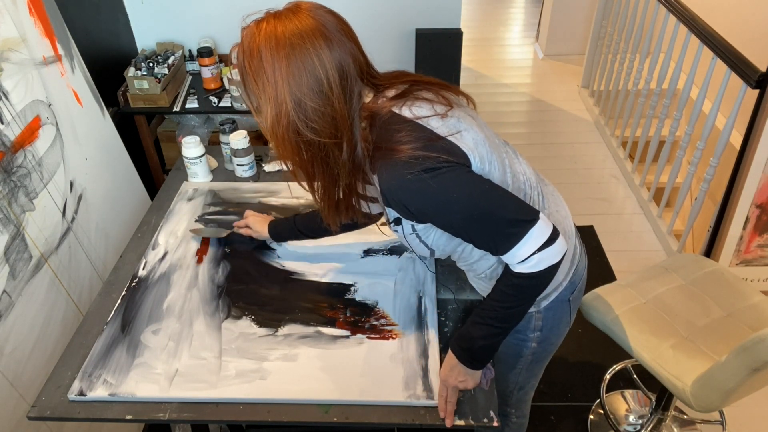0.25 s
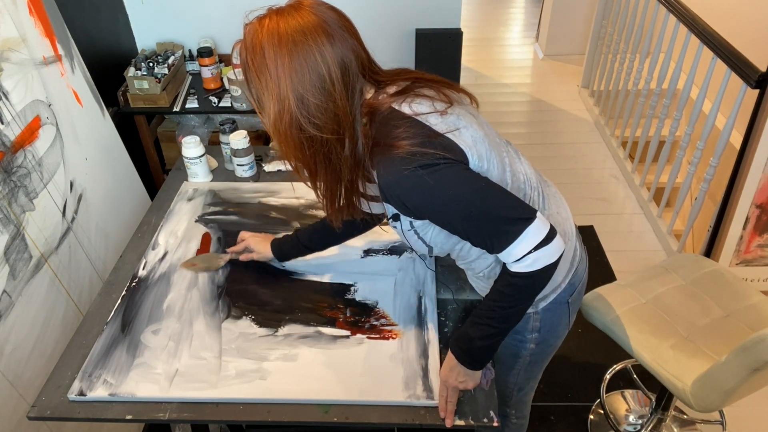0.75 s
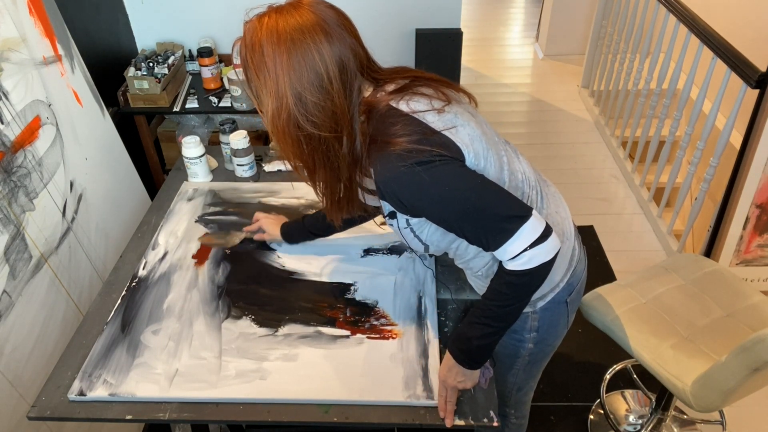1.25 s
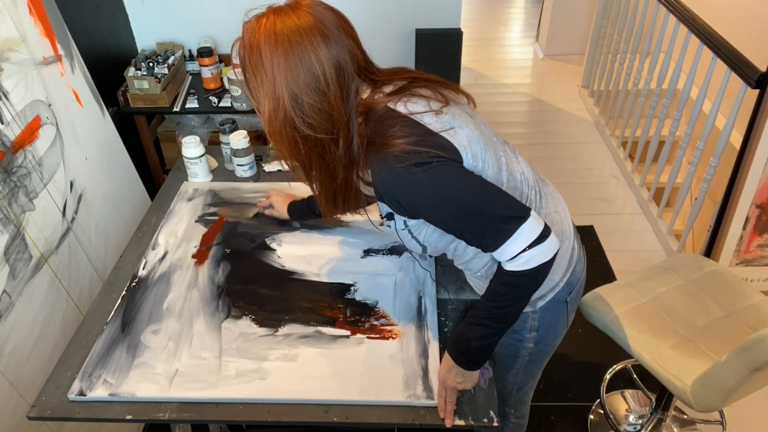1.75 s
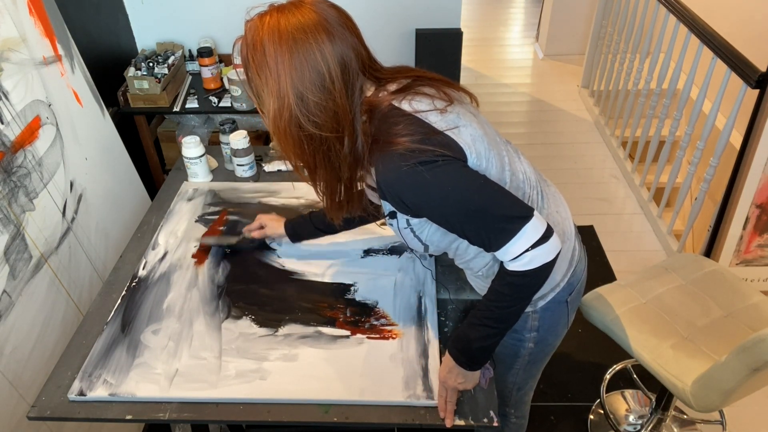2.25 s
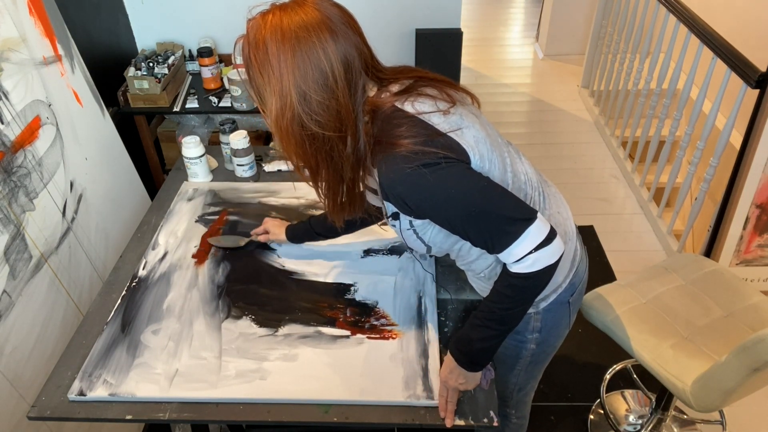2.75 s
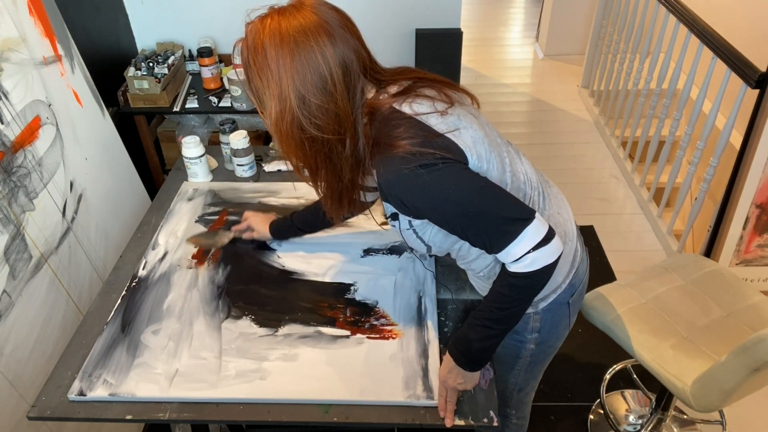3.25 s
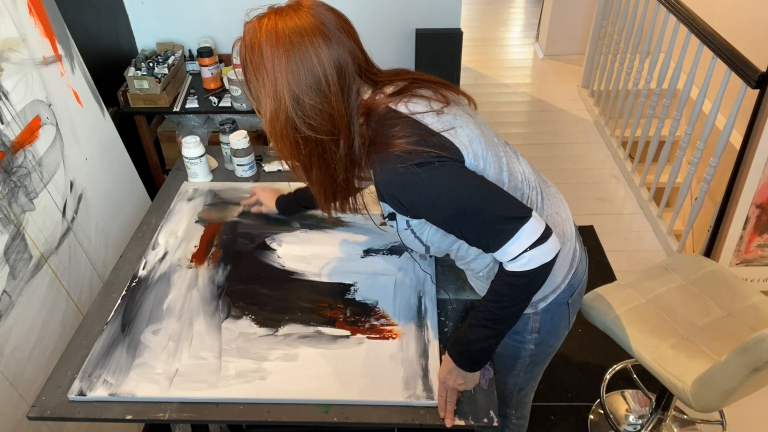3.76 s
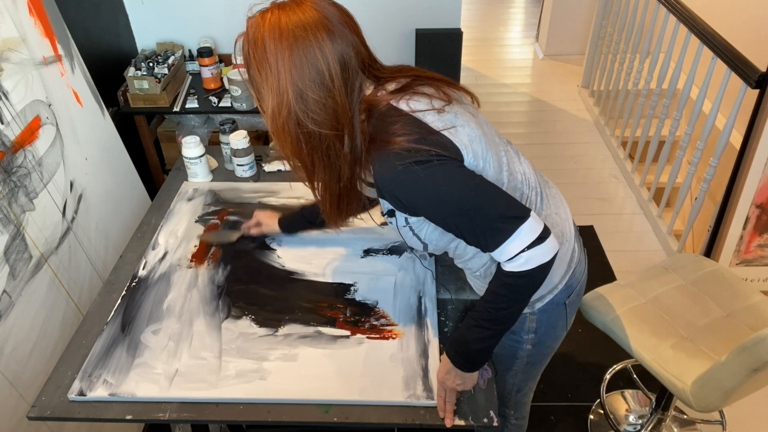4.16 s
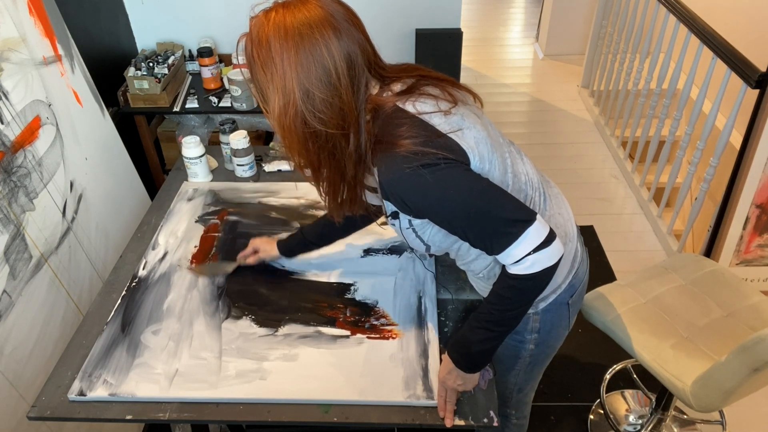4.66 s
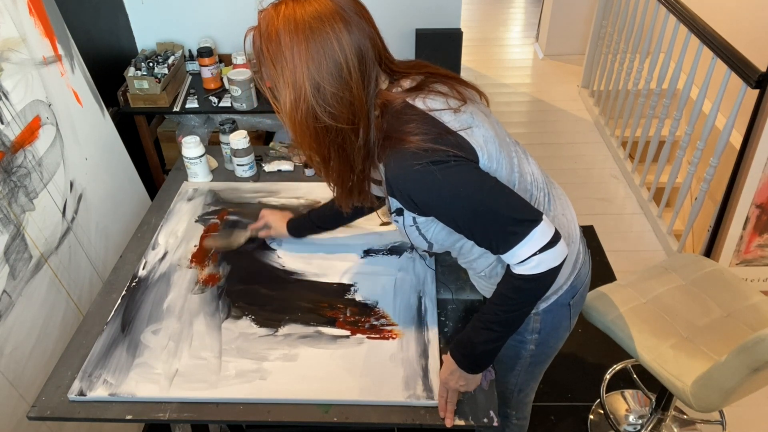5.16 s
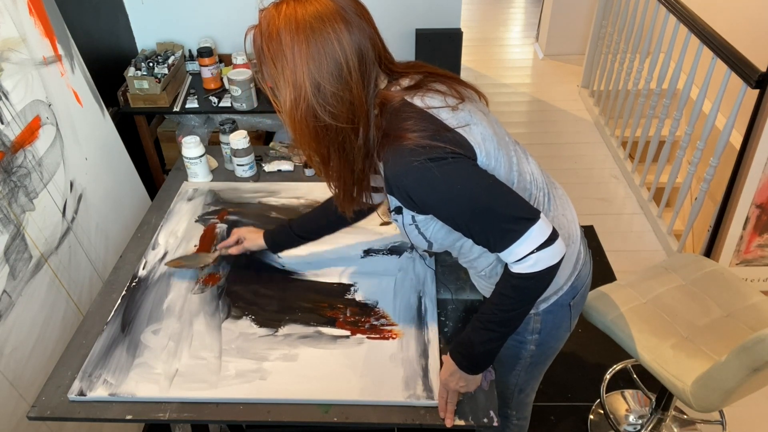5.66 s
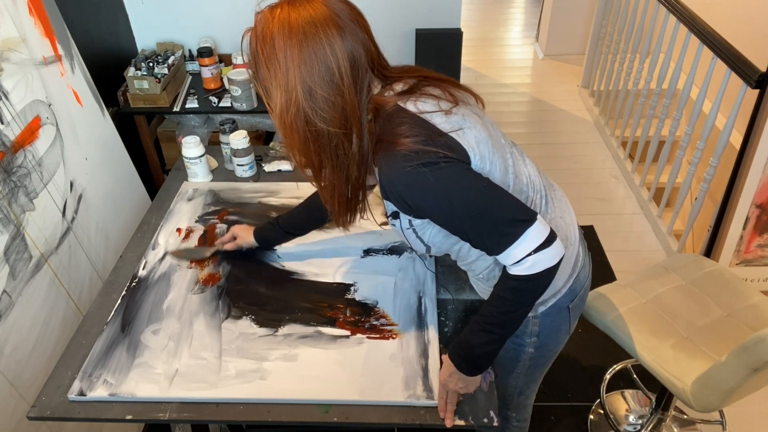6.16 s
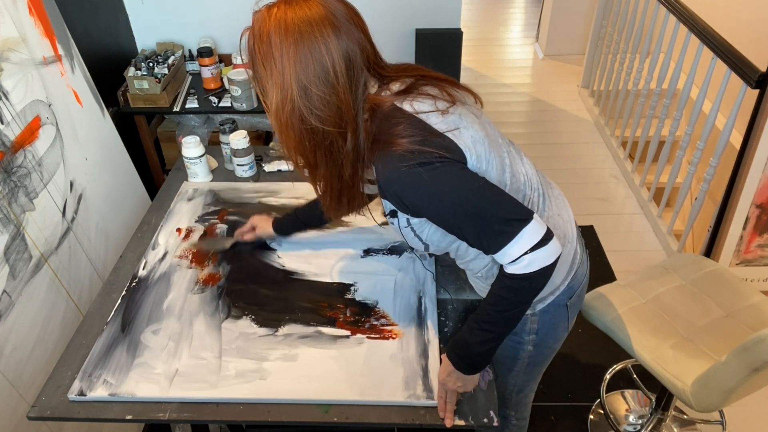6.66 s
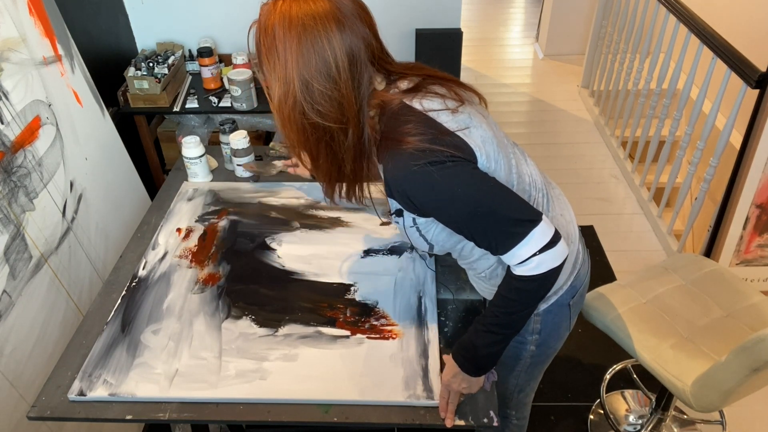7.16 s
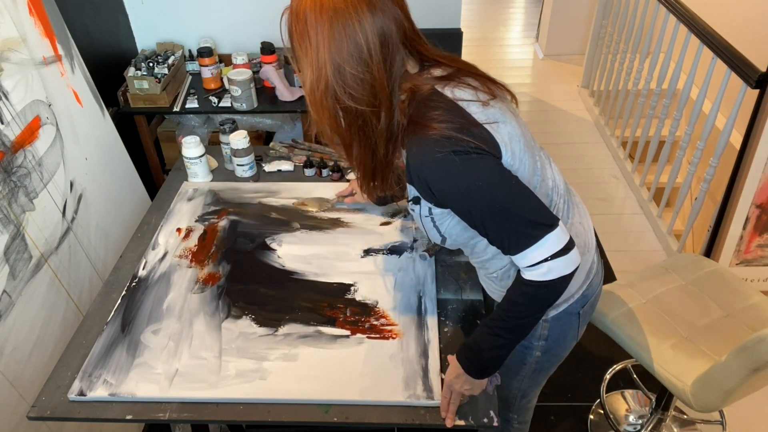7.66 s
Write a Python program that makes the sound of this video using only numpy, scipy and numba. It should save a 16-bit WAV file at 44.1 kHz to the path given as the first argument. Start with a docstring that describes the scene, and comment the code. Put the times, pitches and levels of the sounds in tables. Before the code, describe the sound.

Repeated knocks and gritty scrapes of a flexible blade on stretched canvas, with small squeaks and flicks, ringing briefly in a bare indoor studio.

```python
"""A short, gritty scrape over a deep rumble comes first: a steel palette knife on a stretched canvas.
Then the blade lands again and again on the canvas, which lies on a table, and scrapes paint in short strokes.
Landings ring damped canvas modes with a click and a thud; strokes are noise slips that ring blade and canvas.
Squeaks, bright flicks, soft bumps and one creak fall among them. A bare room rings after each stroke,
over swelling rumble, a low murmur and faint air, all shaped from noise."""
import sys
import numpy as np
from scipy import signal
from scipy.fft import rfft, irfft
from scipy.io import wavfile
from scipy.ndimage import uniform_filter1d
from numba import njit

SR = 44100
rng = np.random.default_rng(int(sys.argv[2]) if len(sys.argv) > 2 else 0)


def natural_amplitude(level_db):
    """Convert a level in decibels to a linear amplitude factor, elementwise."""
    exponent = np.asarray(level_db, float) / 20
    return 10 ** exponent


def unload_wav(signal):
    """Save mono or channel-first audio to the path in sys.argv[1] as 16-bit WAV at rate SR, clipped to [-1, 1]."""
    wavfile.write(
        sys.argv[1],
        SR,
        np.round(np.clip(np.atleast_2d(signal).T, -1, 1) * 32767).astype(np.int16),
    )


N = 348588
T = np.arange(N) / SR

# colour of the deep rumble: pitch_hz, level_db
RUMBLE_COLOUR = [(1.5, -1), (4, 11), (9, 7.5), (17, -4.5), (27, -12), (45, -16), (91, -36.5), (184, -52),
                 (300, -50.5), (600, -100)]
# colour of the faint air: pitch_hz, level_db
AIR_COLOUR = [(210, -43), (350, -2), (733, -8), (1020, -2), (5930, -15.5), (9070, -15.5), (15000, -19)]
# bands of the room tail: pitch_hz, t60_s, level_db
ROOM_BANDS = [(390, 0.36, -3.5), (740, 0.67, -4.5), (1600, 0.65, -4.5), (2800, 0.61, -7.5),
              (5370, 0.6, -11), (8800, 0.35, -10), (14700, 0.21, -28)]
# dull bumps between landings: start_s, level_db (before the swell)
SOFT_BUMPS = [(0.599, -62.5), (1.16, -57), (1.849, -63), (2.602, -60.5), (4.74, -59.5), (7.32, -63)]
# the table groans once: pitch_hz (lower partial), level_db, t60_s
TABLE_CREAK = (280, -40, 0.19)
# the blade sings briefly while pressed: start_s, level_db, length_s, pitch_hz
BLADE_SQUEAKS = [(0.456, -49, .025, 1590), (0.524, -59, .05, 2830), (1.256, -58, .05, 2930),
                 (1.712, -49.5, .03, 1280), (2.528, -54, .03, 1600), (2.538, -50.5, .03, 4110),
                 (2.55, -53, .04, 3200), (2.891, -50, .06, 2020), (2.923, -54, .05, 1720),
                 (3.815, -53, .03, 2750), (4.16, -46, .04, 1670), (4.626, -52.5, .06, 1850),
                 (4.698, -46, .06, 1670), (4.767, -47.5, .05, 2900), (4.81, -45, .04, 3376),
                 (5.139, -52.5, .05, 1850), (5.45, -47.5, .025, 2350), (5.796, -39, .03, 1280),
                 (5.872, -43.5, .04, 1380), (6.168, -48.5, .05, 1660), (6.412, -45, .08, 1840),
                 (6.695, -49, .04, 2370), (7.024, -53.5, .11, 2386), (7.029, -61, .07, 2800),
                 (7.862, -53, .04, 2570)]
# the tip flicks over a ridge of paint: start_s, level_db (at the onset)
TIP_FLICKS = [(0.549, -32.5), (2.9192, -35.5), (3.821, -42), (4.2902, -28), (4.6914, -35), (5.5003, -29),
              (7.0207, -40)]
# blade landings: start_s, knock_peak_db, click_db (over the knock, before CLICK_LIFT_DB)
LANDINGS = [(0.331, -52, -37), (0.46, -56, -1), (0.776, -34.5, -10.5), (1.19, -39.5, -40),
            (1.585, -34, -26), (2.048, -27.5, -16), (2.391, -33, -15), (2.767, -34, -18),
            (3.183, -34, -15.5), (3.576, -30, -15.5), (3.812, -40, -10), (4.14, -32, -9),
            (4.29, -37.5, -0.5), (4.539, -31, -20.5), (4.691, -40, -7), (5.039, -28, -7),
            (5.358, -27.5, -12.5), (5.499, -47, 3), (5.751, -29.5, -12), (6.073, -38.5, -4.5),
            (6.371, -29.5, -14.5), (6.632, -30, -15), (6.908, -28, -17), (7.622, -31, -15.5)]
# colour of the steel click: pitch_hz, level_db
CLICK_COLOUR = [(1200, -1), (2500, 6), (5000, -3), (8000, -12), (12000, -10), (16000, -14)]
# free modes of the stretched canvas: pitch_hz, level_db, t60_s
CANVAS_MODES = [(402, -50, 0.03), (531, -8.5, 0.26), (580, -22, 0.074), (780, -39, 0.042),
                (761.7, 7.5, 0.19), (807, 3.5, 0.077), (844, 6.5, 0.16), (1004, -18.5, 0.17),
                (1079, 2.5, 0.12), (1240, 5, 0.049), (1500, -30, 0.018), (1720, 3, 0.023)]
# colour of the coarse scrape: pitch_hz, level_db
SCRAPE_COLOUR = [(500, -10), (1200, -4.5), (2000, -3.5), (2900, 0), (4200, -7), (6000, -10.5),
                 (8000, -21.5), (12000, -56)]
# colour of the fine hiss and of the flicks: pitch_hz, level_db
HISS_COLOUR = [(4000, -3.5), (6500, -8.5), (8500, -4.5), (11000, -1.5), (13500, -2), (15500, -2)]
# edge dragged through paint: start_s, length_s, start_level_db, lift_level_db, hiss_db (over the scrape)
EDGE_DRAGS = [(.01, 0.051, -43.5, -47.5, -2), (0.459, 0.093, -46, -44, -1), (0.772, 0.074, -50.5, -53, -4),
              (0.852, 0.076, -60, -51, -15.5), (1.208, 0.062, -59, -51.5, -14),
              (1.283, 0.079, -63, -63, -13), (1.704, 0.11, -61.5, -56, -5),
              (2.144, 0.035, -51, -50.5, -8.5), (2.403, .09, -70, -73, -7.5),
              (2.506, 0.052, -60, -45.5, -2), (2.78, 0.084, -71, -77, -7), (2.869, 0.075, -55.5, -43.5, -4),
              (3.181, 0.075, -50, -50, -5.5), (3.275, 0.063, -61, -44.5, -6), (3.575, 0.11, -48, -58.5, -6),
              (3.722, 0.077, -47, -55, -5.5), (3.814, 0.018, -52, -42.5, -9.5),
              (4.137, 0.067, -49.5, -59.5, -7), (4.201, 0.1, -62, -44, -5.5),
              (4.626, 0.055, -63.5, -56, -7), (4.688, 0.07, -53.5, -41.5, -1.5),
              (4.761, 0.072, -45.5, -43.5, -4), (5.035, 0.11, -50, -50, -6),
              (5.375, 0.066, -63, -68.5, -11), (5.445, 0.047, -52, -47, -9),
              (5.493, 0.0074, -35, -39, -1.5), (5.744, 0.077, -46, -55.5, -5),
              (5.826, 0.08, -53.5, -43.5, -4), (6.076, 0.13, -63.5, -44.5, -5),
              (6.402, .065, -66, -45.5, -4), (6.63, 0.084, -48, -52, -4.5), (6.927, 0.06, -65, -61, -17),
              (7.012, 0.033, -44.5, -43.5, -2), (7.696, 0.14, -73, -59.5, -4),
              (7.85, 0.027, -47.5, -51, -16)]
# blade pressed so that it chatters, pitch gliding with the grip:
# start_s, length_s, start_level_db, start_pitch_hz, end_pitch_hz
BLADE_PRESSES = [(.01, 0.059, -48.5, 1190, 1020), (.457, 0.038, -49, 1580, 1240),
                 (0.509, 0.055, -48, 930, 970), (0.775, 0.082, -45.5, 1020, 1280),
                 (.87, 0.059, -58, 1170, 1110), (1.211, 0.12, -53.5, 760, 1110),
                 (1.706, 0.052, -49.5, 1360, 1150), (1.763, 0.048, -47, 880, 835),
                 (2.146, 0.056, -56, 1150, 1030), (2.52, 0.065, -49, 1240, 1080),
                 (2.875, 0.074, -43.5, 1150, 1210), (3.181, 0.079, -42.5, 970, 1110),
                 (3.281, 0.059, -45.5, 1150, 1140), (3.57, 0.12, -47, 990, 1230),
                 (3.72, 0.052, -48, 1030, 960), (3.796, 0.067, -47.5, 830, 860),
                 (4.147, 0.066, -45, 740, 980), (4.213, 0.1, -48.5, 985, 1210),
                 (4.638, 0.071, -45.5, 1230, 1090), (4.69, 0.13, -47, 1190, 1260),
                 (5.037, 0.094, -48.5, 900, 1470), (5.442, 0.072, -46.5, 1190, 1100),
                 (5.75, 0.084, -40, 1050, 1120), (5.835, 0.067, -48, 1290, 1250),
                 (6.077, 0.047, -52, 845, 790), (6.135, .11, -45.5, 1160, 1160),
                 (6.40, 0.096, -45, 1120, 1260), (6.635, 0.079, -43, 870, 1170),
                 (7.007, 0.033, -48.5, 844, 860), (7.665, 0.086, -60, 1060, 870),
                 (7.775, .07, -52.5, 840, 880), (7.853, 0.032, -70, 970, 1150)]

RUMBLE_START_DB, RUMBLE_SAG_DB_PER_S, RUMBLE_SWELL_DB = -33.5, .6, 3
AIR_DB = -77
THUD_DB, THUD_HZ, THUD_SCATTER = -27.5, 115.6, 0.21  # level relative to the knock; scatter in log pitch
BUMP_HZ = 148.6
CREAK_START_S = 6.073
FLICK_T60_S = 0.023
KNOCK_DAMPING = .2  # the blade stays on the cloth, so a knock rings for this share of the free decay
CLICK_LIFT_DB = 3.0
BITE_S = 0.011
DRAG_LIFT_DB_PER_S, PRESS_LIFT_DB_PER_S = 356, 506  # fade once the edge is lifted
PRESS_SAG_DB_PER_S = 36
TOP_HZ = 15900


def unit(x):
    """Scale to rms 1."""
    return x / np.sqrt(np.mean(x ** 2))


def colour(x, points):
    """Shape a noise by (Hz, dB) points on a log axis."""
    hz, db = np.transpose(points)
    f = np.fft.rfftfreq(len(x), 1 / SR)
    gain_db = np.interp(np.log(f + 1), np.log(hz), db, left=-90)
    return irfft(rfft(x) * natural_amplitude(gain_db), len(x))


@njit
def svf(x, hz, width):
    """Band-pass with a moving centre, gain 1 there; width in Hz."""
    y, band, low = np.empty(len(x)), 0., 0.
    for i in range(len(x)):
        g, k = np.tan(np.pi * hz[i] / SR), width / hz[i]
        v = (band + g * (x[i] - low)) / (1 + g * (g + k))
        band, low, y[i] = 2 * v - band, low + 2 * g * v, k * v
    return y


def walk(rate):
    """Random levels of rms 1, held 1 / rate s and slewed twice."""
    k = int(SR / rate)
    held = np.repeat(rng.standard_normal(N // k + 1), k)
    slewed = uniform_filter1d(uniform_filter1d(held, k), k)
    return unit(slewed[:N])


def background():
    """Deep rumble that swells and slowly ebbs, low murmur of the building that flickers, and faint air."""
    deep_db = RUMBLE_START_DB - RUMBLE_SAG_DB_PER_S * T + RUMBLE_SWELL_DB * walk(2.7)
    rumble = unit(colour(rng.standard_normal(N), RUMBLE_COLOUR)) * natural_amplitude(deep_db)
    murmur = unit(svf(rng.standard_normal(N), np.full(N, 190.), 104.0)) * natural_amplitude(-74.5 + 4.2 * walk(5))
    air = natural_amplitude(AIR_DB) * unit(colour(rng.standard_normal(N), AIR_COLOUR))
    return rumble + murmur + air


def tail():
    """One diffuse path: bands of noise that die at their own rates, the lowest and highest soonest."""
    t, out = np.arange(SR) / SR, 0
    for hz, t60, db in ROOM_BANDS:
        skirts = [(hz / 2, -30), (hz / 1.33, -3), (hz, 0), (hz * 1.41, -3), (hz * 2, -30)]
        band = colour(rng.standard_normal(SR), skirts)
        # a longer decay is not a louder one
        out = out + band * natural_amplitude(db - 60 * t / t60) / np.sqrt(t60 * SR / np.log(1e6))
    return out * np.minimum(t / .008, 1)


def room(x, count=5):
    """The knife keeps moving, so every 30 ms the sound reaches the walls by another path, in rotation."""
    place = (T / .03) % count
    out = 0
    for k in range(count):
        distance = np.abs((place - k + count / 2) % count - count / 2)
        share = np.maximum(1 - distance, 0)
        out = out + signal.fftconvolve(x * np.sqrt(share), tail())[:N]
    return out


def bumps():
    """Soft low thuds, part sine and part narrow noise, that swell and die; every landing sends one."""
    out, t = np.zeros(N + SR), np.arange(SR // 4) / SR
    pitch = THUD_HZ * np.exp(THUD_SCATTER * rng.standard_normal(len(LANDINGS)))
    thuds = [(s, db + THUD_DB, hz) for (s, db, _), hz in zip(LANDINGS, pitch)]
    swell = t / 0.026 * np.exp(1 - t / 0.023)
    for s, db, hz in thuds + [(s, db, BUMP_HZ) for s, db in SOFT_BUMPS]:
        rough = unit(svf(rng.standard_normal(len(t)), np.full(len(t), 1. * hz), 64.0))
        body = np.sin(2 * np.pi * hz * t) + 0.81 * rough
        out[int(s * SR):][:len(t)] += natural_amplitude(db) * swell * body
    return out[:N]


def creak():
    """A short groan of two decaying partials, strongest on the second."""
    hz, db, t60 = TABLE_CREAK
    t = np.maximum(T - CREAK_START_S, 0)
    tone = .4 * np.sin(2 * np.pi * hz * t) + np.sin(4 * np.pi * hz * t)
    return natural_amplitude(db - 60 * t / t60) * np.minimum(t / 0.011, 1) * tone


def squeaks():
    """Slips lock to one blade resonance for a moment: narrow noise, faded at both ends."""
    out = np.zeros(N + SR)
    for s, db, length, hz in BLADE_SQUEAKS:
        n = int(length * SR)
        # keep the end of a longer tone, where the resonance has built up
        tone = unit(svf(rng.standard_normal(SR // 4), np.full(SR // 4, 1. * hz), 61.0))[-n:]
        out[int(s * SR):][:n] += natural_amplitude(db) * signal.windows.tukey(n, .6) * tone
    return out[:N]


def flicks():
    """A bright spit of hiss that dies at once."""
    out, t = np.zeros(N + SR), np.arange(SR // 10) / SR
    for s, db in TIP_FLICKS:
        spit = unit(colour(rng.standard_normal(len(t)), HISS_COLOUR))
        out[int(s * SR):][:len(t)] += natural_amplitude(db - 60 * t / FLICK_T60_S) * spit
    return out[:N]


def ring(modes, length_s=.25):
    """Response of damped modes to one blow."""
    t = np.arange(int(length_s * SR)) / SR
    return sum(natural_amplitude(db - 60 * t / t60) * np.sin(2 * np.pi * hz * t) for hz, db, t60 in modes)


def taps():
    """Each landing strikes another spot, so modes weigh and sit differently; steel click and scratch on top."""
    out, t = np.zeros(N + SR), np.arange(SR // 4) / SR
    spots = rng.standard_normal((len(LANDINGS), len(CANVAS_MODES), 2))
    gaps_s = rng.uniform(0.0023, 0.00595, len(LANDINGS))
    push = np.diff(np.hanning(int(0.00083 * SR)))  # wet paint cushions the blow
    click_fade = natural_amplitude(-60 * t / 0.006) + natural_amplitude(-11 - 60 * t / 0.15)  # click, then the quieter scratch
    for (s, db, click_db), spot, gap_s in zip(LANDINGS, spots, gaps_s):
        modes = [(hz * (1 + 0.018 * shift), mode_db + 2.35 * weight, KNOCK_DAMPING * t60)
                 for (hz, mode_db, t60), (weight, shift) in zip(CANVAS_MODES, spot)]
        knock = np.convolve(ring(modes), push)[:len(t)]
        knock = knock + 0.7 * np.roll(knock, int(gap_s * SR))  # the springy blade touches once more
        knock = knock / np.abs(knock).max()
        click = unit(colour(rng.standard_normal(len(t)), CLICK_COLOUR)) * click_fade
        out[int(s * SR):][:len(t)] += natural_amplitude(db) * (knock + natural_amplitude(click_db + CLICK_LIFT_DB) * click)
    return out[:N]


def grit(spread_db):
    """Dense slips of the edge on grains of paint, a few larger than the rest."""
    return unit(rng.standard_normal(N) * natural_amplitude(spread_db * rng.exponential(size=N)))


def patchy(x, points, spread_db):
    """Colour a noise in narrow bands that drift, swell and sink alone, as the edge meets other paint."""
    lowest, highest = points[0][0], points[-1][0]
    out = 0
    for hz in lowest * 2 ** np.arange(0, np.log2(highest / lowest), 1 / 4):
        band = svf(x, hz * (1 + .03 * walk(12)), hz / 8)
        out = out + band * natural_amplitude(spread_db * walk(30))
    return unit(colour(out, points))


def contact(s, length, from_db, to_db, lift_db_per_s):
    """Force of one contact: a quick bite, a straight ramp in dB, a steady fade after the lift."""
    t = T - s
    db = np.interp(t, [0, length], [from_db, to_db]) - lift_db_per_s * np.maximum(t - length, 0)
    return np.clip(t / BITE_S, 0, 1) * natural_amplitude(db)


def chatter(slips):
    """Slips ring the flexed blade, whose pitch follows the grip, and the canvas, with a dull rasp around."""
    grip = np.array(sorted(point for s, length, _, from_hz, to_hz in BLADE_PRESSES
                           for point in ((s, from_hz), (s + length, to_hz))))
    flex_hz = np.interp(T, *grip.T) * (1 + .02 * walk(40))
    blade = svf(svf(slips, flex_hz, 170.), flex_hz, 500.) * natural_amplitude(1.3 * walk(90))
    skin = signal.fftconvolve(slips, ring(CANVAS_MODES))[:N]
    rasp = svf(svf(slips, 1.19 * flex_hz, 1220.0), 1.14 * flex_hz, 1700.0)
    return unit(unit(blade) + natural_amplitude(-3.0) * unit(skin) + natural_amplitude(-5.0) * unit(rasp))


def strokes():
    """Grit slips scrape and make the pressed blade chatter; finer grit hisses under the same drags."""
    drags = [contact(s, length, from_db, to_db, DRAG_LIFT_DB_PER_S)
             for s, length, from_db, to_db, _ in EDGE_DRAGS]
    fine = sum(force * natural_amplitude(row[-1]) for force, row in zip(drags, EDGE_DRAGS))
    press = sum(contact(s, length, db, db - PRESS_SAG_DB_PER_S * length, PRESS_LIFT_DB_PER_S)
                for s, length, db, _, _ in BLADE_PRESSES)
    slips = grit(2.4) * natural_amplitude(1.57 * walk(70))  # uneven weave makes the force judder
    scrape = patchy(slips, SCRAPE_COLOUR, 3.3)
    hiss = patchy(grit(2.5), HISS_COLOUR, 1.8)
    return sum(drags) * scrape + press * chatter(slips) + fine * hiss


def scene():
    """Knife and table with their room tail, then the bumps and background without it."""
    near = strokes() + squeaks() + taps() + flicks() + creak()
    return (near + room(near) + bumps() + background())[None]


def top_cut(x):
    """Nothing passes above the cut-off."""
    return signal.sosfilt(signal.butter(12, 16500, fs=SR, output="sos"), x)


def record(dry):
    """A steep low-pass takes off the extreme top."""
    low_pass = signal.ellip(8, .2, 50, TOP_HZ, fs=SR, output="sos")
    mix = signal.sosfilt(low_pass, dry)
    return top_cut(mix)


dry = scene()
out = record(dry)
unload_wav(out)
```